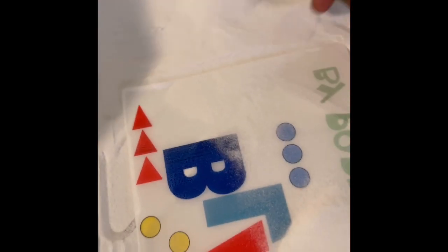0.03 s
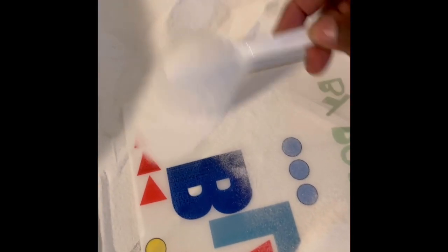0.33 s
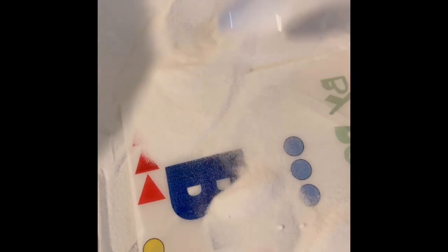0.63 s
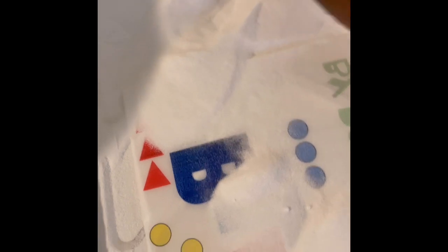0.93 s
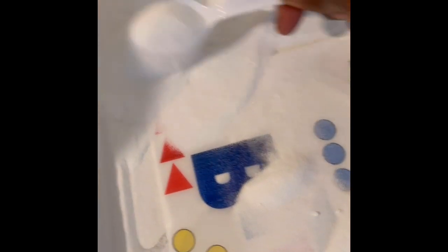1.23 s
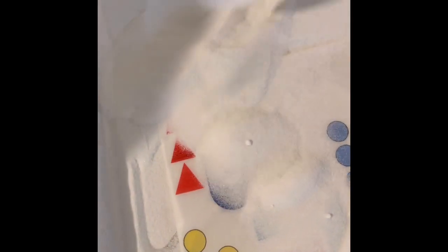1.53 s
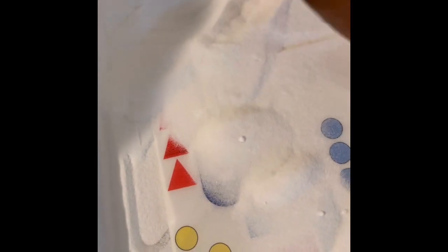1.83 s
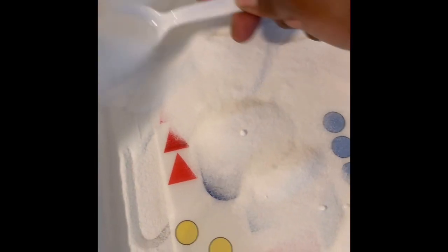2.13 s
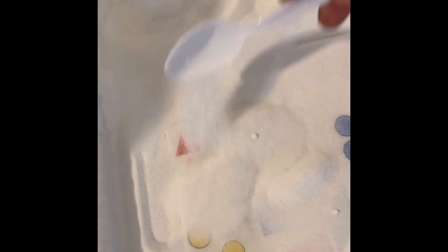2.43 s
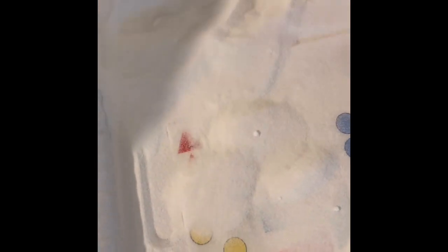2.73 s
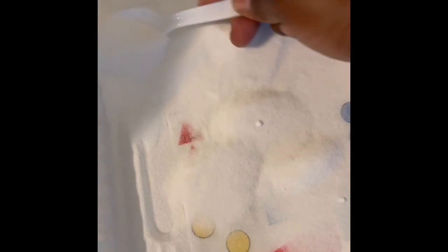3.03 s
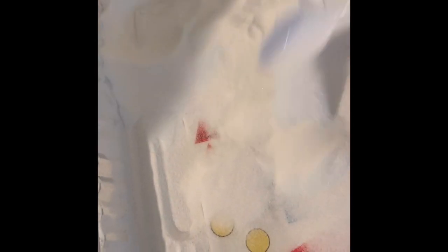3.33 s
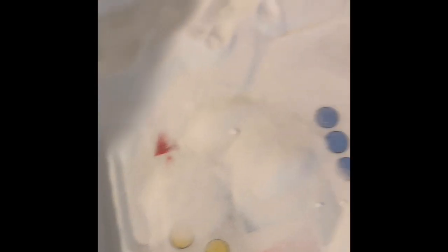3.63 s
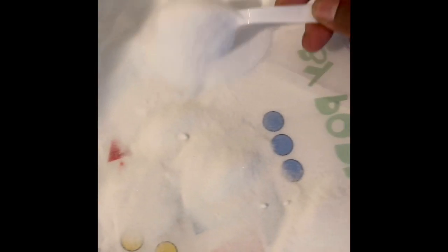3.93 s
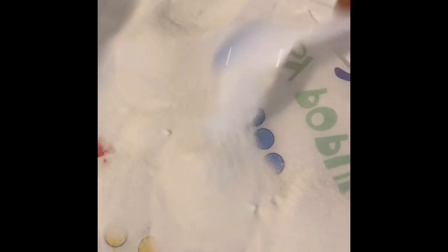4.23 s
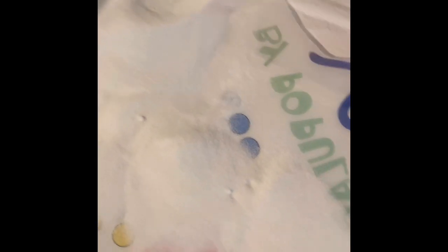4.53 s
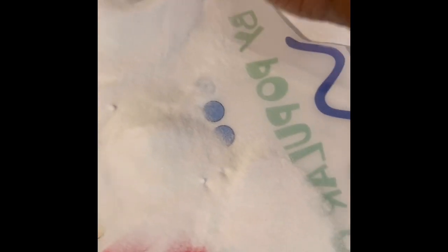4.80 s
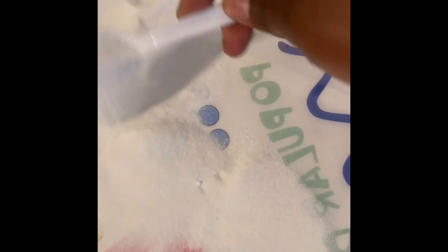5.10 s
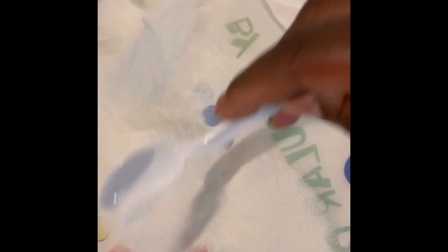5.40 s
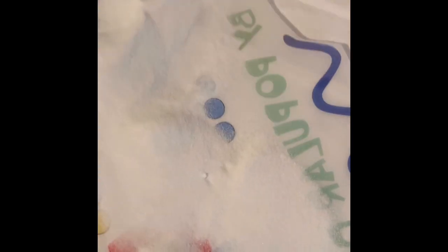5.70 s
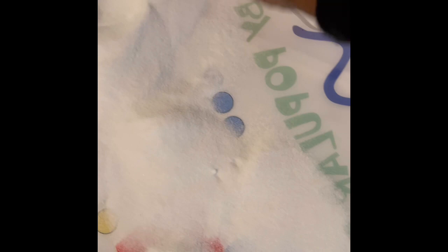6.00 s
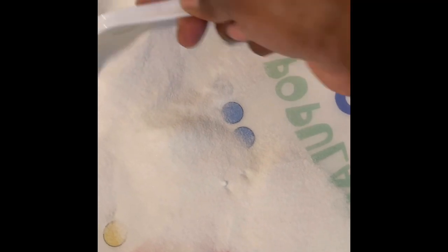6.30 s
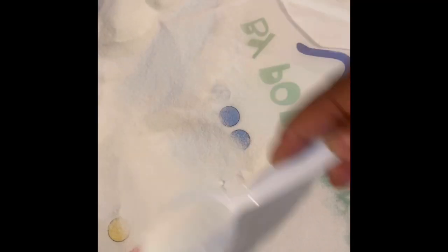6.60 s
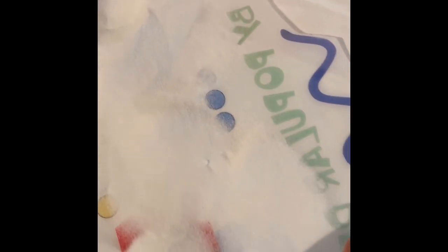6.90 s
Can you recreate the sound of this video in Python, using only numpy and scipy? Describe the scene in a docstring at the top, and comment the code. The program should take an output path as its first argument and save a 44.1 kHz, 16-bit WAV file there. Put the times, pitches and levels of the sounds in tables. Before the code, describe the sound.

A plastic scoop knocks into a tub, crunches through fine powder and pours it out with a soft hiss, several times.

```python
"""A plastic scoop digs fine powder from a plastic tub and tips it over a printed film, repeatedly.
Most digs open with a knock that rings the tub wall; packed powder then crunches and creaks under the rim.
Once, the scoop's neck raps on the tub. Each pour is a soft, bright hiss of grains with a patter of crumbs.
Behind: faint swishes, sleeve rustle, machine hum. Small workroom, close microphone pair."""
import sys
import numpy as np
from scipy import signal
from scipy.fft import rfft, irfft, next_fast_len
from scipy.io import wavfile

SR = 44100
rng = np.random.default_rng(int(sys.argv[2]) if len(sys.argv) > 2 else 0)


def int16_out(signal):
    """Quantize to a 16-bit WAV file."""
    q = np.round(np.clip(np.atleast_2d(signal).T, -1, 1) * 32767)
    wavfile.write(sys.argv[1], SR, q.astype(np.int16))


N = 306495

# machine lines: (frequency [Hz], relative level [dB], waver [dB])
HUM_LINES = [(120.4, -49.5, -1), (142.9, -54.5, 4.5), (239, -65.5, 3.5), (477, -72, 2.5)]
# arm reaches: (fastest [s], relative level [dB], rise [s], t60 [s])
ARM_REACHES = [(1.25, -82, 0.18, 0.69), (2.0, -69, 0.28, .8), (3.08, -79, 0.15, 0.83),
               (4.2, -70, 0.18, 0.67), (5.44, -63.5, 0.092, 0.21), (6.68, -73, 0.056, 1.7)]
# breath-like swishes: (peak [s], level [dB], rise [s], t60 [s], band centre [Hz])
SOFT_SWISHES = [(1.25, -74, 0.21, 0.56, 3220), (3.08, -78, .05, .2, 3720)]
# pours: (fullest [s], relative level [dB], rise [s], t60 [s], sparkle offset [dB], patter offset [dB])
POURS = [(0.222, -57, 0.035, 0.29, -16, -25), (0.355, -60, 0.032, 0.39, -28, -18),
         (0.391, -50.5, 0.004, 0.29, -7.5, -5), (0.562, -57.5, 0.033, 0.1, -20, -5.5),
         (1.15, -76.5, 0.053, 0.13, -14, -20), (1.335, -54, 0.024, 0.25, -26, -14),
         (1.911, -45.5, 0.0081, 0.11, -23, -18), (2.07, -69.5, 0.46, 0.7, -13, -24),
         (2.278, -56, 0.074, 0.29, -5, -19), (2.406, -66.5, 0.018, 0.022, -10, -10),
         (3.19, -75.5, 0.043, 0.62, -21.5, -12), (3.345, -70.5, .05, 0.13, -30, -6),
         (4.14, -63.5, 0.15, 1, -12, -11), (4.291, -51.5, 0.084, 0.096, -13, -10),
         (5.13, -77, .05, 0.98, -26, -20), (5.244, -48, 0.026, 0.34, -13, -11.5),
         (6.686, -63, 0.1, 0.66, -33, -18), (6.905, -69, .04, 0.68, -18, -21)]
# strokes through powder: (start [s], deepest [s], end [s], relative hiss [dB], relative crunch [dB])
DIG_STROKES = [(-0.02, 0.0, 0.082, -59, -55), (0.739, 0.806, 1, -53.5, -51),
               (1.649, 1.743, 1.85, -53.5, -52), (1.908, 1.925, 1.897, -68, -51.5),
               (2.66, 2.66, 2.973, -52.5, -50.5), (3.495, 3.63, 3.755, -55, -53),
               (4.441, 4.493, 4.77, -52, -47), (4.813, 4.83, 4.87, -53, -54.5),
               (5.694, 5.693, 5.94, -52, -48), (5.928, 5.998, 6.105, -53.5, -54.5)]
# creaks: (middle [s], relative tone [dB], pitch [Hz], length [s], relative rasp [dB], roughness [ratio])
CREAKS = [(0.07, -47.5, 645, .013, -58, 0.7), (0.077, -46.5, 1307, 0.0057, -60, 0.27),
          (0.858, -40.5, 582, 0.023, -59, 0.63), (0.905, -41, 698, 0.029, -51.5, 1.1),
          (0.994, -47, 632, 0.036, -53.5, 1.3), (1.756, -42, 691, .022, -66, 1.2),
          (1.782, -44, 720, 0.0054, -72, 0.33), (1.825, -46, 628, 0.017, -51, 1.1),
          (1.937, -49, 732, 0.032, -54.5, 1.2), (2.713, -37, 604.5, 0.018, -55, 0.83),
          (2.79, -39.5, 610, 0.01, -49, 0.41), (2.807, -46.5, 756, .013, -43, .5),
          (2.923, -41.5, 761.5, .016, -44, .6), (2.937, -43.5, 667, .015, -54, 0.86),
          (3.534, -48, 1037, .006, -56, 0.16), (3.552, -51, 1050, .01, -63, .4),
          (3.618, -49, 720, 0.0076, -50, 0.8), (3.633, -43.5, 638, 0.0086, -52, 0.32),
          (3.663, -45, 760, .008, -48.5, .7), (3.677, -47, 832, 0.013, -46, 0.73),
          (3.718, -47, 2290, 0.0058, -65, .3), (3.731, -49.5, 669, .016, -70, 0.7),
          (3.775, -50, 664, 0.016, -59, 0.59), (4.455, -34, 518, 0.0078, -60, 0.31),
          (4.467, -26.5, 722, 0.0039, -41, 0.33), (4.484, -37, 1084, 0.015, -49, .25),
          (4.515, -32.5, 1017, 0.013, -48.5, .25), (4.528, -41, 990, 0.0064, -61, .25),
          (4.545, -30, 985, 0.0056, -44, .2), (4.555, -27, 1013, .012, -44, 0.36),
          (4.583, -35, 1014, 0.012, -44.5, 0.32), (4.615, -38, 704, 0.012, -43.5, 0.18),
          (4.653, -43.5, 600, 0.0076, -69, 0.35), (4.685, -41, 4200, 0.0078, -54, 1.8),
          (4.692, -39, 1402, 0.0084, -50, 0.23), (4.786, -47, 704, 0.011, -52, .7),
          (4.829, -47, 624, .009, -56, 0.58), (5.879, -32.5, 596, 0.0086, -51, 0.65),
          (5.967, -44.5, 624, 0.016, -55.5, 1.06), (6.06, -46.5, 634, 0.022, -55.5, 0.83),
          (6.113, -46.5, 638, 0.023, -55, 1.3)]
# scoop neck on tub rim: (time [s], relative ring [dB], brightness [Hz], relative snap [dB])
NECK_RAPS = [(5.8237, -23.5, 2600, -42), (5.8317, -20, 4200, -28), (5.8358, -17, 5000, -21.5),
             (5.8401, -26, 5000, -25), (5.8451, -27, 5000, -29)]
# scoop on tub wall: (time [s], relative ring [dB], brightness [Hz], relative grit [dB],
# pitch [ratio], ring time [ratio])
TUB_KNOCKS = [(0.7421, -12, 3130, -45, 0.99, 0.9), (0.751, -23, 4500, -37, 1.18, 0.54),
              (0.757, -31, 3500, -38, 1.1, .9), (0.7858, -28.5, 3800, -41, 1.03, 0.69),
              (1.6563, -23, 2050, -37, 0.99, 1.16), (1.6632, -29.5, 3000, -32, 1.2, 0.52),
              (1.6843, -31.5, 1700, -42, 0.99, 1.0), (1.908, -41, 4000, -41, 1.05, 0.34),
              (2.6466, -12.5, 2290, -46, 0.98, 0.93), (2.6561, -35, 3000, -38, 1.0, 0.59),
              (2.666, -27, 2800, -46, 0.98, 0.72), (2.677, -27, 3200, -38, 0.96, 0.75),
              (4.447, -25.5, 1020, -51, 1.07, 0.91), (4.4646, -32, 2500, -40.5, 0.89, 0.54),
              (4.837, -58, 6100, -34, 0.83, 0.66), (5.701, -11, 1690, -34.5, 1.05, 0.91),
              (5.707, -30, 4500, -28, 1.17, 1.0), (5.715, -33, 4500, -30.5, 1.21, 0.65),
              (5.729, -33, 3500, -37, 1.04, .9), (5.761, -33, 3000, -45, 1.06, 0.85),
              (5.8334, -20.5, 1800, -34, 0.98, 1.3), (5.849, -16, 402, -50, .95, 0.94),
              (5.8893, -18.5, 1200, -35.5, 0.62, 0.68)]

# body modes: (nominal frequency [Hz], relative level [dB], nominal t60 [s])
TUB_MODES = [(83, -21.5, 0.46), (157.6, -17.5, 0.14), (230.6, -26.5, 0.22), (400, -23, 0.053),
             (472, -20, 0.09), (626, -11, 0.0346), (920, 1, 0.021), (1024, -0.5, 0.02), (1046, -8, 0.038),
             (1530, -5, 0.016), (1756, -13, 0.0349), (1818, -4.5, 0.023), (1930, -7, 0.0208),
             (2320, -3.5, 0.011), (2630, -14, 0.036), (3080, -10.5, 0.02), (3450, -8.5, 0.016),
             (3660, -6, 0.0091), (4116, -13, 0.02), (5600, 2, 0.007), (6540, -3, 0.0076)]
SCOOP_MODES = [(367, -13.5, 0.072), (500, -19.5, 0.084), (704, -13.5, .03), (1056, -1.5, 0.057),
               (1500, -10, 0.031), (1740, -6, .05), (1927, -8.5, .038), (2455, -9.5, .04), (3000, -7, .018),
               (3400, -6.5, 0.0285), (3990, -9, .025), (4350, -10, .028), (4360, -9.5, .028),
               (5400, -11, 0.027)]

# source and echo spectra: (frequency [Hz], relative level [dB])
AIR_SPECTRUM = [(20, -38.5), (33, -26), (47, 7.5), (65, -4), (85, -1.5), (105, -5), (135, 3), (175, -8.5),
                (260, -12.5), (360, -21.5), (650, -23.5), (1500, -35.5), (3600, -51), (6000, -53),
                (8500, -51), (11000, -51.5), (13000, -71)]
CLOTH_SPECTRUM = [(700, -10), (1400, -1), (2100, -3), (3200, 1), (4200, -6), (6000, -13.5), (11000, -40),
                  (13000, -35.5)]
POUR_SPECTRUM = [(600, -11.5), (2000, -19.5), (3200, -15.5), (4500, -10.5), (5800, -3), (7300, -6),
                 (8800, 2), (10000, 0), (11000, -1.5), (12000, -22.5), (13000, -32), (14000, -46)]
PATTER_SPECTRUM = [(500, -9.5), (2000, -17), (3200, -10), (4200, 2.5), (6000, -7), (8000, -6), (11000, -20),
                   (13000, -47)]
SPARKLE_SPECTRUM = [(8000, -39), (10500, 4), (11700, 3.5), (12800, -20), (14000, -40)]
DIG_HISS_SPECTRUM = [(2000, -28.5), (3500, -14), (5000, -7), (6500, -5.5), (7700, -4), (8800, 5.5),
                     (10000, -7.5), (11100, 1), (12000, -11.5), (13000, -66)]
CRUNCH_SPECTRUM = [(150, 6), (330, -2.5), (480, 1), (650, -1), (950, -6.5), (1350, -16), (2100, -12),
                   (3000, -13), (4200, -9), (5500, -27.5), (9000, -86)]
RASP_SPECTRUM = [(500, -0.5), (1300, 0.5), (1800, 0.5), (2500, -2), (3200, -12.5), (4200, -6),
                 (5500, -10.5), (9000, -38)]
GRIT_SPECTRUM = [(500, 7), (2000, -6.5), (3200, 2.5), (4200, 4.5), (6500, -2), (7800, -3), (8900, 13.5),
                 (10000, 4.5), (11200, 0.5), (12500, -10), (14000, -52.5)]
TUB_ECHO_SPECTRUM = [(200, 5), (600, -2.5), (3000, 1.5), (9000, -4.5)]
ROOM_ECHO_SPECTRUM = [(300, 0), (3000, -0.5), (11000, -8)]

# off-centre tub: (frequency [Hz], left minus right [dB])
TUB_BALANCE = [(250, 4.5), (600, -3.5), (1000, -4), (1500, 0), (2200, 3.5), (3500, -3), (5800, 0.5)]
# microphone pair width: (frequency [Hz], side gain [dB])
MIC_WIDTH = [(150, -21), (300, -6.5), (600, 3.5), (1900, -2), (2700, 3), (4300, 2.5), (5900, -6), (7200, 4),
             (9200, -23), (10800, 8), (12300, -8)]
# microphone pair phase: (frequency [Hz], left lead [rad])
MIC_PHASE = [(20, 0), (450, 0), (1000, .5), (2000, .2), (4200, .5), (4800, 3.1), (5450, 5.9), (6200, 6.4),
             (8300, 9.0), (9600, 9.5), (11900, 12.5), (14000, 12.566)]


def from_db(db):
    """Decibels to gain."""
    return 10 ** (np.asarray(db) / 20)


def unit_rms(x):
    """Scale to unit power."""
    return x / np.sqrt(np.mean(x ** 2) + 1e-20)


def decay(t, t60_s):
    """Exponential fall, 60 dB per t60_s."""
    return np.exp(-np.log(1000) * t / t60_s)


def colour(x, spectrum):
    """Filter by (Hz, dB) points on a log frequency axis."""
    size = next_fast_len(x.shape[-1] + 512)
    hz, db = np.transpose(spectrum)
    grid_hz = np.maximum(np.fft.rfftfreq(size, 1 / SR), 1)
    gain = from_db(np.interp(np.log(grid_hz), np.log(hz), db))
    return irfft(rfft(x, size) * gain, size)[..., :x.shape[-1]]


def drift(rate_hz):
    """Random wander, unit RMS."""
    knots = rng.standard_normal(8192)
    return unit_rms(np.interp(np.arange(N) / SR * rate_hz, np.arange(len(knots)), knots))


def shifting_bands(x, depth_db, rate_hz, count):
    """Overlapping bands swell and fade independently."""
    size = next_fast_len(N + 512)
    spectrum, hz = rfft(x, size), np.fft.rfftfreq(size, 1 / SR)
    centres_hz = np.geomspace(1500, 12000, count)
    bands = (irfft(spectrum * np.interp(hz, centres_hz, peak), size)[..., :N] for peak in np.eye(count))
    return sum(band * from_db(depth_db * drift(rate_hz)) for band in bands)


def swells(rows, crest_s):
    """Gain of gestures that build, crest and die; summed in power."""
    t, power = np.arange(0, N, 20) / SR, 0
    for peak_s, db, rise_s, t60_s in rows:
        building = np.exp(-2 * (np.minimum(t - peak_s, 0) / rise_s) ** 2)
        dying = decay(np.hypot(np.maximum(t - peak_s, 0), crest_s) - crest_s, t60_s)
        power += (from_db(db) * building * dying) ** 2
    return np.interp(np.arange(N) / SR, t, np.sqrt(power))


def grains(per_s, spread_db):
    """Tiny fractures: impulses of random time, size and sign."""
    sizes = from_db(spread_db * np.minimum(rng.exponential(1, N), 4)) * rng.choice([-1, 1], N)
    return sizes * (rng.random(N) < per_s / SR)


def grain_patch(per_s, spread_db, side_db):
    """Stereo patch of powder: shared grains plus weaker side grains."""
    mid, side = grains(per_s, spread_db), grains(per_s, spread_db)
    return mid + from_db(side_db) * side * np.array([[1], [-1]])


def modal_ring(t, modes, bright_hz, pitch_ratio, t60_ratio, vary_db):
    """Modes after one touch; soft contact omits the high ones, pressure damps them."""
    hz, db, t60_s = np.transpose(modes)[:, :, None]
    strength = from_db(db + vary_db * rng.standard_normal(hz.shape)) / np.hypot(1, (hz / bright_hz) ** 3)
    sign = (-1) ** ((np.arange(len(modes)) + 1) // 2)[:, None]
    tones = np.sin(2 * np.pi * hz * pitch_ratio * t)
    return np.sum(sign * strength * decay(t, t60_s * t60_ratio) * tones, axis=0)


def grit_burst(t, t60_s):
    """Bright, dying burst of contact noise."""
    return unit_rms(colour(rng.standard_normal(len(t)), GRIT_SPECTRUM)) * decay(t, t60_s)


def add_echoes(x, wet_db, t60_s, spectrum):
    """Dense, dying reflections, different per side."""
    t = np.arange(SR // 2) / SR
    tail = colour(rng.standard_normal((2, len(t))), spectrum) * (t > 0.0015) * decay(t, t60_s)
    tail = from_db(wet_db) * unit_rms(tail) / np.sqrt(len(t))
    return x + signal.fftconvolve(np.atleast_2d(x), tail, axes=1)[:, :N]


def machine(air_db, hum_gain_db):
    """Wavering mains and motor lines over air rumble."""
    t, hum = np.arange(N) / SR, 0
    for hz, db, waver_db in HUM_LINES:
        amplitude = np.sqrt(2) * from_db(db + hum_gain_db + waver_db * drift(6))
        hum += amplitude * np.sin(2 * np.pi * hz * t + 0.2 * waver_db * drift(5))
    return hum + from_db(air_db) * unit_rms(colour(rng.standard_normal((2, N)), AIR_SPECTRUM))


def sleeve(gain_db):
    """Cloth rustles, never quite still, louder on each reach."""
    motion = np.hypot(from_db(-80.5), swells(ARM_REACHES, crest_s=0.025))
    cloth = shifting_bands(rng.standard_normal((2, N)), depth_db=4.0, rate_hz=18, count=8)
    return from_db(gain_db) * motion * unit_rms(colour(cloth, CLOTH_SPECTRUM))


def swishes(width_hz):
    """Faint, narrow, breath-like swishes near 3-4 kHz."""
    out = 0
    for *swell, hz in SOFT_SWISHES:
        band = signal.butter(2, [hz - width_hz / 2, hz + width_hz / 2], "band", fs=SR, output="sos")
        band_noise = unit_rms(signal.sosfilt(band, rng.standard_normal((2, N))))
        out += swells([swell], crest_s=0.066) * band_noise
    return out


def grain_hiss(flow, sparkle, spectrum, gain_db, flutter_db, side_db):
    """Loose grains rub and land; the fastest add a high sparkle."""
    rubs = grain_patch(per_s=12000, spread_db=3.5, side_db=side_db) * from_db(flutter_db * drift(70))
    rubs = shifting_bands(rubs, depth_db=0.1, rate_hz=25, count=10)
    hiss = flow * unit_rms(colour(rubs, spectrum))
    top = sparkle * unit_rms(colour(rubs, SPARKLE_SPECTRUM))
    return from_db(gain_db) * (hiss + top)


def pours(crest_s):
    """Powder slides off in a swell of hiss; crumbs patter on the film."""
    flow = swells([row[:4] for row in POURS], crest_s)
    sparkle = swells([(s, db + top_db, rise, t60) for s, db, rise, t60, top_db, _ in POURS], crest_s)
    patter_rows = [(s, db + patter_db, rise, t60) for s, db, rise, t60, _, patter_db in POURS]
    crumbs = unit_rms(colour(grain_patch(per_s=1500, spread_db=1.5, side_db=-6.5), PATTER_SPECTRUM))
    hiss = grain_hiss(flow, sparkle, POUR_SPECTRUM, gain_db=3.5, flutter_db=1.05, side_db=-9.5)
    return hiss + swells(patter_rows, crest_s=0.008) * crumbs


def dig_loads(attack_s, sink_db_per_s, ease_db, release_db_per_s):
    """Hiss and crunch gains: load grows as the scoop sinks, eases as it lifts."""
    t, hiss, crunch = np.arange(0, N, 20) / SR, 0, 0
    for start_s, deepest_s, end_s, hiss_db, crunch_db in DIG_STROKES:
        release = from_db(-release_db_per_s * np.maximum(t - end_s, 0))
        contact = np.clip((t - start_s) / attack_s, 0, 1) * release
        lifted = np.clip((t - deepest_s) / max(end_s - deepest_s, attack_s), 0, 1)
        load_db = -sink_db_per_s * np.maximum(deepest_s - t, 0) - ease_db * lifted
        hiss += contact * from_db(hiss_db + load_db)
        crunch += contact * from_db(crunch_db + load_db)
    return [np.interp(np.arange(N) / SR, t, gain) for gain in (hiss, crunch)]


def rim_chatter(load, gain_db, per_s, bright_hz, spots):
    """The loaded rim slips in jerks; each spot ticks the wall at its own pitch."""
    t, ticks = np.arange(SR // 10) / SR, 0
    rings = [modal_ring(t, TUB_MODES, bright_hz, pitch_ratio, t60_ratio=0.7, vary_db=4.5)
             for pitch_ratio in np.geomspace(0.7, 1.25, spots)]
    for ring in rings:
        ticks += signal.oaconvolve(grains(per_s / spots, spread_db=1.0), ring)[:N]
    return from_db(gain_db) * load * unit_rms(ticks)


def lump_bursts(load, gain_db, per_s, band_hz, ring_cycles, pitches):
    """Lumps burst against the hollow scoop, each a brief ring."""
    t, out = np.arange(SR // 25) / SR, 0
    for hz in np.geomspace(*band_hz, pitches):
        age = np.log(1000) * t * hz / ring_cycles
        ring = age * np.exp(-age) * np.sin(2 * np.pi * hz * t)
        out += signal.oaconvolve(grains(per_s / pitches, spread_db=3.0), ring)[:N]
    return from_db(gain_db) * load * unit_rms(out)


def powder_crunch(load, gain_db, slip_db):
    """Packed powder yields in uneven bursts of fractures."""
    fractures = grain_patch(per_s=1300, spread_db=0.5, side_db=-5) * from_db(slip_db * drift(110))
    return from_db(gain_db) * load * unit_rms(colour(fractures, CRUNCH_SPECTRUM))


def powder_creaks(tone_gain_db, overtone_db, rasp_gain_db, glide_octaves):
    """Stick-slip in squeezed powder: short gliding groans; each slip cracks a few grains."""
    out, t = np.zeros(N), np.arange(N) / SR
    jitter = drift(450) + 1j * drift(450)  # uneven slips widen the tone into a band
    rasp = from_db(rasp_gain_db) * unit_rms(colour(grains(per_s=3500, spread_db=0.5), RASP_SPECTRUM))
    for middle_s, tone_db, hz, length_s, rasp_db, roughness in CREAKS:
        near = np.abs(t - middle_s) < 2 * length_s
        progress = (t[near] - middle_s) / length_s
        slip_hz = hz * 2 ** (glide_octaves * rng.standard_normal() * progress)
        phase = 2 * np.pi * np.cumsum(slip_hz) / SR
        tone = np.exp(1j * phase) + from_db(overtone_db) * np.exp(2j * phase)
        uneven = (1 + roughness * jitter[near]) / np.sqrt(1 + 2 * roughness ** 2)
        slips = from_db(tone_db + tone_gain_db) * np.real(uneven * tone)
        cracks = from_db(rasp_db) * rasp[near] * (1 + np.cos(phase))
        out[near] += np.exp(-np.pi * progress ** 2) * (slips + cracks)
    return out


def neck_raps(ring_gain_db, snap_gain_db, snap_t60_s):
    """Hard plastic on plastic: a snap, then the scoop rings freely."""
    out, t = np.zeros(N + SR), np.arange(SR // 7) / SR
    for time_s, ring_db, bright_hz, snap_db in NECK_RAPS:
        ring = modal_ring(t, SCOOP_MODES, bright_hz, pitch_ratio=0.99, t60_ratio=0.84, vary_db=3.0)
        snap = from_db(snap_db + snap_gain_db) * grit_burst(t, snap_t60_s)
        at = round(time_s * SR)
        out[at:at + len(t)] += from_db(ring_db + ring_gain_db) * ring + snap
    return out[:N]


def judder(gap_s, scatter, ring_drops_db, grit_drop_db, rebound_bright_hz):
    """Yield each knock, then its weaker rebounds, uneven in time and pitch."""
    for time_s, ring_db, bright_hz, grit_db, pitch_ratio, t60_ratio in TUB_KNOCKS:
        yield time_s, ring_db, bright_hz, grit_db, pitch_ratio, t60_ratio
        for drop_db in ring_drops_db:
            stretch, detune = np.exp(scatter * rng.standard_normal(2))
            time_s += gap_s * stretch
            grit_db -= grit_drop_db
            yield time_s, ring_db - drop_db, rebound_bright_hz, grit_db, pitch_ratio * detune, t60_ratio


def tub_knocks(ring_gain_db, grit_gain_db, grit_t60_s):
    """The scoop strikes and judders; each touch rings the tub and cracks grains."""
    out, t = np.zeros(N + SR), np.arange(SR // 7) / SR
    hits = judder(gap_s=0.011, scatter=0.11, ring_drops_db=(21, 30),
                  grit_drop_db=13, rebound_bright_hz=4010)
    for time_s, ring_db, bright_hz, grit_db, pitch_ratio, t60_ratio in hits:
        ring = modal_ring(t, TUB_MODES, bright_hz, pitch_ratio, t60_ratio, vary_db=2.0)
        grit = from_db(grit_db + grit_gain_db) * grit_burst(t, grit_t60_s)
        at = round(time_s * SR)
        out[at:at + len(t)] += from_db(ring_db + ring_gain_db) * ring + grit
    return out[:N]


def scene():
    """Tub to one side, film straight ahead."""
    flow, load = dig_loads(attack_s=0.011, sink_db_per_s=71, ease_db=9.5, release_db_per_s=793)
    tub = tub_knocks(ring_gain_db=-6, grit_gain_db=2.0, grit_t60_s=0.019)
    tub += powder_creaks(tone_gain_db=-1.0, overtone_db=-19.5, rasp_gain_db=-2.0, glide_octaves=0.1011)
    tub += rim_chatter(load, gain_db=-6.5, per_s=260, bright_hz=5000, spots=8)
    tub += lump_bursts(load, gain_db=-4.5, per_s=600, band_hz=(1600, 2930), ring_cycles=12.3, pitches=9)
    tub += lump_bursts(load, gain_db=-5.0, per_s=160, band_hz=(501, 803), ring_cycles=8.1, pitches=6)
    tub += neck_raps(ring_gain_db=-5.5, snap_gain_db=2.0, snap_t60_s=0.016)
    tub = add_echoes(tub, wet_db=-15, t60_s=0.045, spectrum=TUB_ECHO_SPECTRUM)
    tub += powder_crunch(load, gain_db=1.0, slip_db=2.5)
    left = colour(tub[0], [(hz, db / 2) for hz, db in TUB_BALANCE])
    right = colour(tub[1], [(hz, -db / 2) for hz, db in TUB_BALANCE])
    sparkle = from_db(-18.5) * flow  # few grains fly inside the tub
    dig_hiss = grain_hiss(flow, sparkle, DIG_HISS_SPECTRUM, gain_db=5.0, flutter_db=2.5, side_db=-7.0)
    work = np.array([left, right]) + dig_hiss + pours(crest_s=0.028)
    work = add_echoes(work, wet_db=-12.0, t60_s=0.15, spectrum=ROOM_ECHO_SPECTRUM)
    return work + sleeve(gain_db=2.0) + swishes(width_hz=330) + machine(air_db=-47.5, hum_gain_db=-2.5)


def record(dry, cutoff_hz=13700):
    """Close microphone pair: bass alike, treble out of step, top cut."""
    mid = (dry[0] + dry[1]) / 2
    side = colour((dry[0] - dry[1]) / 2, MIC_WIDTH)
    size = next_fast_len(N + 512)
    lead_rad = np.interp(np.fft.rfftfreq(size, 1 / SR), *np.transpose(MIC_PHASE))
    right = irfft(rfft(mid - side, size) * np.exp(-1j * lead_rad), size)[:N]
    lowpass = signal.ellip(10, 0.1, 70, cutoff_hz, fs=SR, output="sos")
    return signal.sosfilt(lowpass, [mid + side, right])


dry = scene()
out = record(dry)
int16_out(out)
```